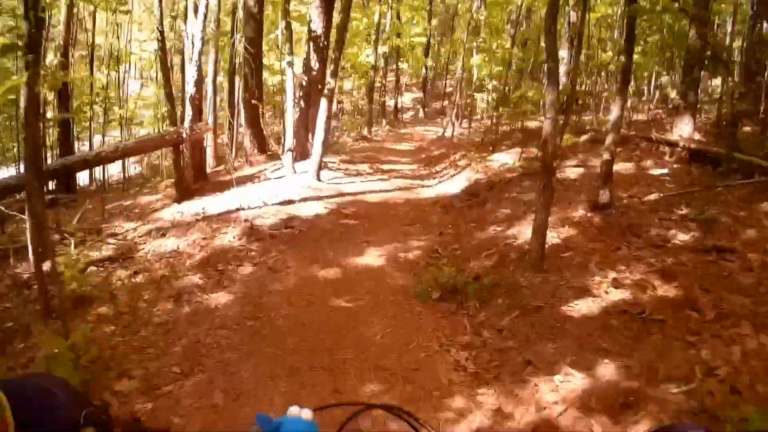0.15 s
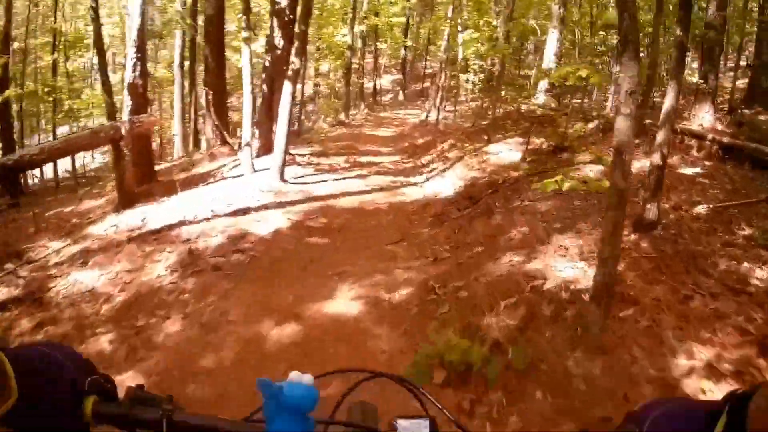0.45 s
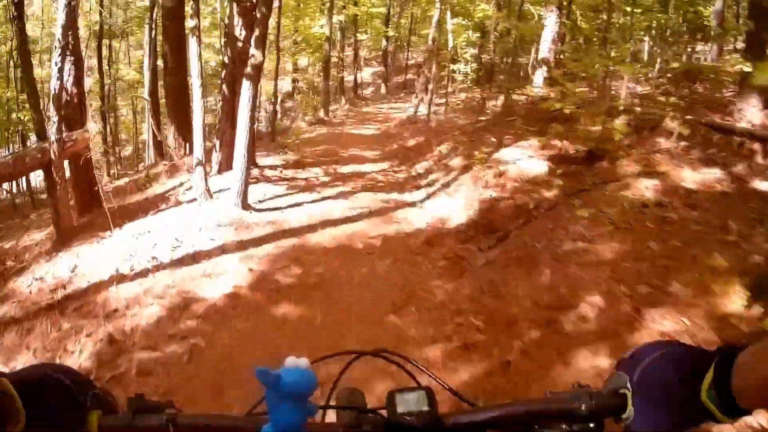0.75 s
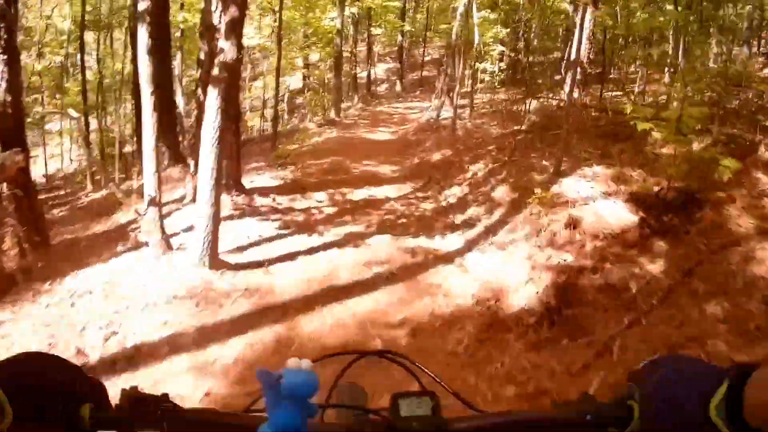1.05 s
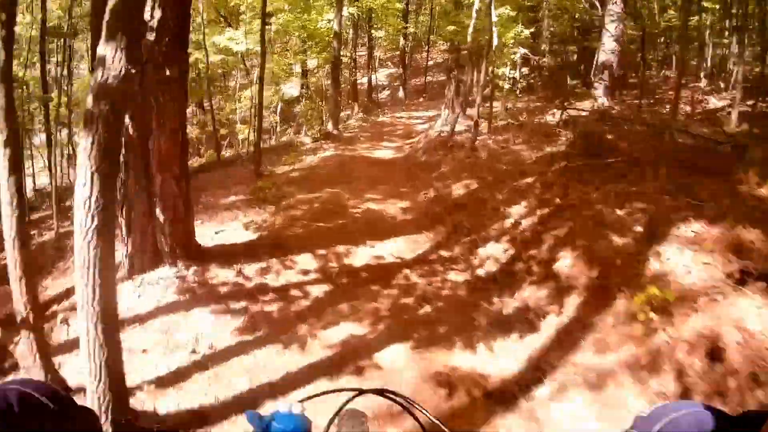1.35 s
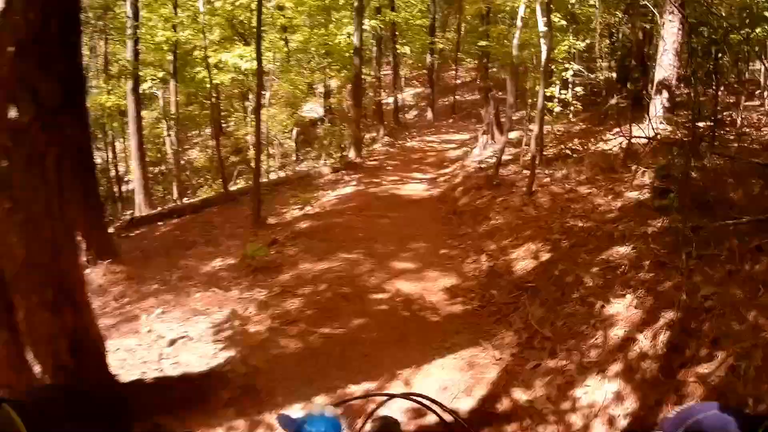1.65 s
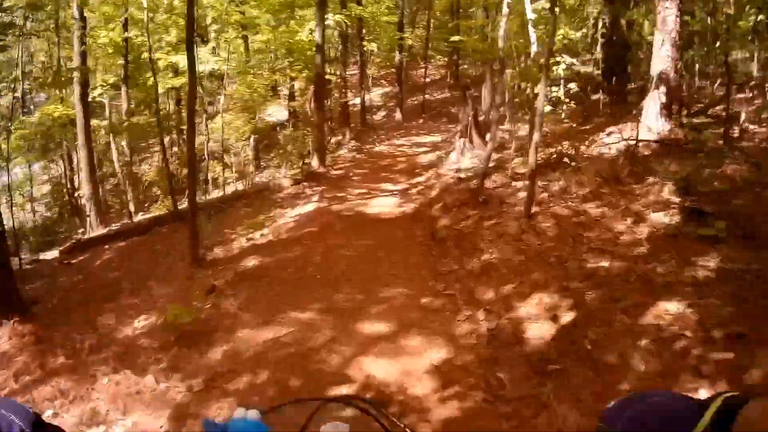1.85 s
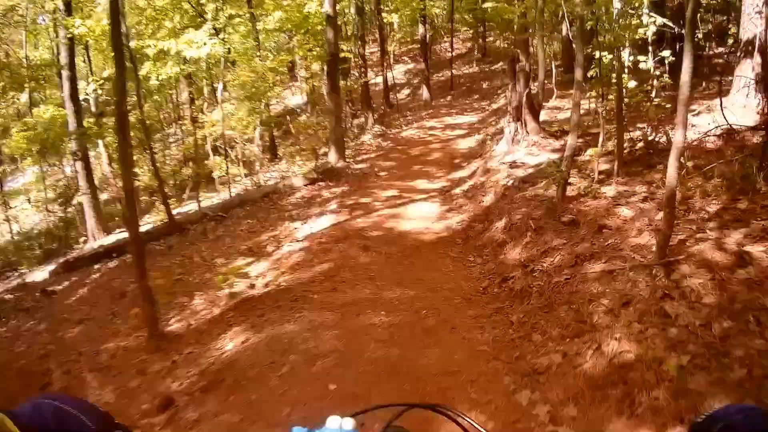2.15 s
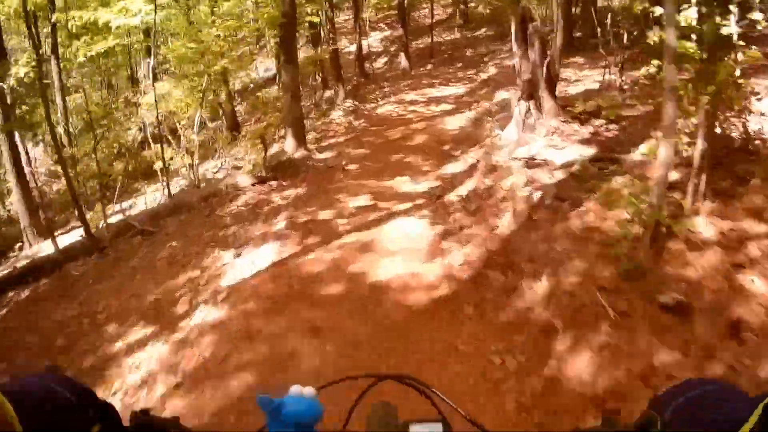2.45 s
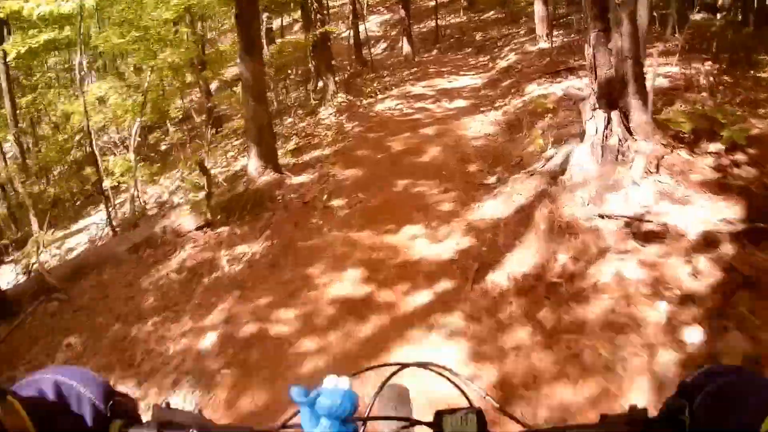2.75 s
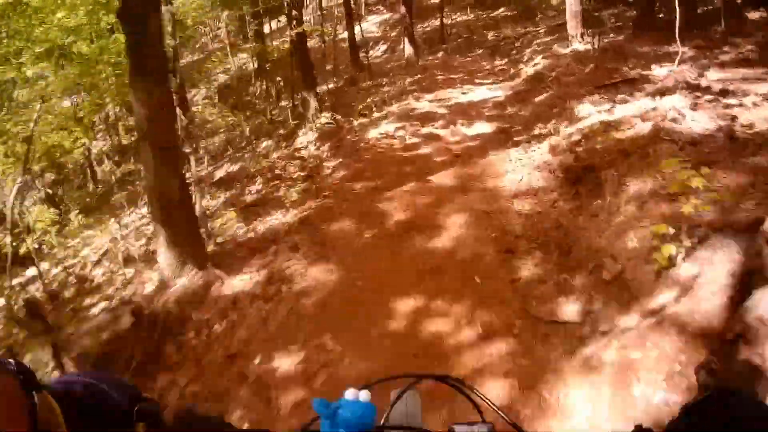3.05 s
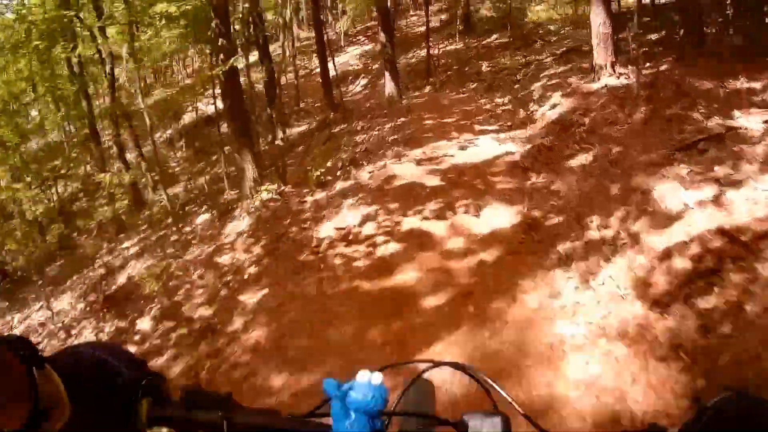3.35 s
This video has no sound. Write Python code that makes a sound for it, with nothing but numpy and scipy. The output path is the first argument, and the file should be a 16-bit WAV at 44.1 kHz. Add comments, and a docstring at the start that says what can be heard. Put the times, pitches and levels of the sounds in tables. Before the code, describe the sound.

Mountain bike tyres roll on a dirt trail, heard close from the rider's chest. At 0-1 s there is faint crunching, a brief soft hum, thin hiss and whine, small stone pops and low wind. A dry tick comes near 1.25 s. From 1.6 s grit and leaves crunch louder; after 2.2 s dull knocks, snaps and clicks crowd in. Wind buffets peak around 3 s with a low shudder at 2.9 s, then ease slightly.

```python
"""A mountain bike gathers speed down a dirt trail in the woods, heard from the rider's chest.
Tyres roll and crunch over dirt, grit and dry leaves: random impacts and noise, filtered and swelling.
Stones and twigs pop, crumbs break and bumps knock as short damped rings; a hard part ticks, litter scuffs.
A low shudder comes late; buffeting wind is lumpy filtered noise, over hiss, a brief hum and a thin whine."""
import sys
import numpy as np
from scipy import signal
from scipy.fft import rfft, irfft
from scipy.io import wavfile

SR = 44100
rng = np.random.default_rng(int(sys.argv[2]) if len(sys.argv) > 2 else 0)


def transcribe(signal):
    """Save signal, clipped to [-1, 1], as a 16-bit WAV file at the path in sys.argv[1]."""
    frames = np.atleast_2d(signal).T
    limited = np.clip(frames, -1, 1)
    pcm = np.round(limited * 32767).astype(np.int16)
    wavfile.write(sys.argv[1], SR, pcm)


N = 154350

# tyres on the ground: t/s, roll level/dB, crunch level/dB (before layer trims)
TYRE_LEVELS = [(0, -68, -64.5), (.25, -72.5, -65.5), (.4, -62.5, -62.5), (.7, -61.5, -64), (.8, -60, -61),
               (1.3, -55.5, -58.5), (1.5, -56.5, -56.5), (1.62, -53.5, -55.5), (1.8, -51.5, -55.5),
               (2.05, -48.5, -51), (2.2, -46.5, -50), (2.3, -47, -50.5), (2.43, -38.5, -47),
               (2.53, -41, -53.5), (2.66, -41, -47), (2.73, -46, -53), (2.85, -40.5, -45.5),
               (2.92, -42, -51.5), (3.03, -41, -50), (3.13, -41.5, -50), (3.19, -41.5, -47),
               (3.5, -41.5, -49.5)]
# crunching grit, relative density: f/Hz, level/dB
CRUNCH_SPECTRUM = [(300, -12), (650, -4), (880, 3.5), (1020, -3), (1170, -3), (1480, -15), (2050, -9.5),
                   (2750, -21), (3500, -21.5), (6000, -32.5), (12000, -64)]


def amp(db):
    """Decibels to gain."""
    return 10 ** (np.asarray(db) / 20)


def unit(x):
    """Scales to rms 1."""
    return x / np.sqrt(np.mean(x ** 2) + 1e-20)


def level(table, axis=1):
    """Gain over time from one dB column, linear in dB between points."""
    rows = np.array(table)
    return amp(np.interp(np.arange(N) / SR, rows[:, 0], rows[:, axis]))


def add(mix, s, sound):
    """Mixes a sound in at time s, in place."""
    part = mix[max(round(s * SR), 0):][:len(sound)]
    part += sound[:len(part)]


def colour(x, points):
    """Minimum-phase filter with the given spectrum; rms 1."""
    hz, db = np.transpose(points)
    log_hz = np.log(abs(np.fft.fftfreq(N, 1 / SR)) + 1)
    log_gain = np.log(amp(np.interp(log_hz, np.log(hz), db)))
    # the Hilbert transform of log gain gives the minimum phase
    response = np.exp(np.conj(signal.hilbert(log_gain)))[:N // 2 + 1]
    return unit(irfft(rfft(x) * response, N))


def drift(rate_hz):
    """Smooth random wander, mostly near and below the given rate; rms 1."""
    ratio = np.fft.rfftfreq(N, 1 / SR) / rate_hz
    return unit(irfft(rfft(rng.standard_normal(N)) * ratio * np.exp(-ratio ** 2), N))


def band(hz, width_hz):
    """Noise in one resonance; rms 1."""
    offset = (np.fft.rfftfreq(N, 1 / SR) - hz) / width_hz * 2
    return unit(irfft(rfft(rng.standard_normal(N)) / (1 + offset ** 2), N))


def grains(per_s, spread_db):
    """Random impacts, most small and a few large; rms 1."""
    size = amp(spread_db * np.minimum(rng.exponential(1, N), 4))
    sign = rng.choice([-1, 1], N)
    return unit(size * sign * (rng.random(N) < per_s / SR))


def snap(hz, cycles):
    """A short damped ring; its envelope reaches 1 after half the given cycles."""
    t = np.arange(2048) / SR
    age = t * hz / cycles * 2
    return age * np.exp(1 - age) * np.sin(2 * np.pi * hz * t)


def background():
    """Steady filtered hiss, a thin phase-wandering whine and an early hum of narrow-band noise."""
    # relative density: f/Hz, level/dB
    hiss_spectrum = [(100, 8), (900, 7.5), (1400, 7.5), (2100, 7.5), (2800, 0.5), (3500, -1), (7000, 0),
                     (13500, -3), (15500, -14)]
    # hum, fading while the bike is slow: t/s, level/dB
    hum_levels = [(0, -58.5), (.13, -59), (.17, -68), (.33, -70), (.39, -64), (.45, -73), (.7, -97)]
    hiss_db, whine_db, whine_hz = -69.5, -88, 8613
    turn = 2 * np.pi * np.arange(N) / SR
    hiss = colour(rng.standard_normal(N), hiss_spectrum)
    hum = band(hz=515, width_hz=70) * level(hum_levels)
    whine = unit(np.sin(whine_hz * turn + 1.0 * drift(rate_hz=13)))
    return amp(hiss_db) * hiss + hum + amp(whine_db) * whine


def wind():
    """Buffets strike the microphone in lumps, over low eddies that grow less with the gusts."""
    # gusts before trim: t/s, level/dB
    gust_levels = [(0, -55.5), (.1, -62), (.15, -48), (.25, -55), (.32, -44.5), (.45, -50.5), (.54, -47),
                   (.82, -47), (.95, -40.5), (1.18, -45.5), (1.4, -40.5), (1.6, -43), (1.71, -36.5),
                   (1.79, -38.5), (1.88, -32), (2.08, -34), (2.3, -30.5), (2.36, -34), (2.44, -31),
                   (2.5, -30.5), (2.56, -29.5), (2.67, -28), (2.73, -34), (2.81, -27.5), (2.88, -29.5),
                   (2.97, -25.5), (3.18, -31.5), (3.3, -29.5), (3.5, -35.5)]
    # relative densities: f/Hz, level/dB
    buffet_spectrum = [(15, -15.5), (30, -10), (70, -1.5), (130, -4.5), (180, -11.5), (300, -21.5),
                       (600, -36), (2000, -84)]
    eddy_spectrum = [(12, -11.5), (26, -9), (42, 2.5), (70, -11), (150, -49), (600, -91)]
    buffet_trim_db, eddy_db, eddy_growth = -0.57, -39, 0.65  # growth: exponent on gust gain
    gust = level(gust_levels)
    lumps = unit(amp(1.5 * drift(rate_hz=6.6)))
    buffets = colour(rng.standard_normal(N), buffet_spectrum) * lumps
    eddies = colour(rng.standard_normal(N), eddy_spectrum)
    return amp(buffet_trim_db) * buffets * gust + amp(eddy_db) * eddies * unit(gust ** eddy_growth)


def shudder():
    """A rough patch shudders the bike: an unsteady low tone swells quickly, then releases slowly."""
    start_s, attack_s, fall_db_per_s = 2.905, 0.02, 42
    shudder_hz, shudder_db = 76, -22.5
    t = np.arange(N) / SR
    age = np.maximum(t - start_s, 0)
    swell = np.minimum(age / attack_s, 1) * amp(shudder_db - fall_db_per_s * age)
    tone = np.sin(2 * np.pi * shudder_hz * t + 0.81 * drift(rate_hz=14.8))
    return swell * unit(tone * amp(1.8 * drift(rate_hz=13)))


def knocks():
    """Wheels meet bumps: dull blows, each a heavily damped low ring."""
    # blows: t/s, level/dB, f/Hz
    blows = [(2.198, -29.5, 200), (2.304, -28.5, 165), (2.34, -31, 240), (2.424, -25.5, 170),
             (2.463, -28, 170), (2.558, -23, 150), (2.827, -23.5, 215), (2.84, -27.5, 260),
             (2.865, -25.5, 175), (2.938, -28, 300), (2.957, -22.5, 110), (3.032, -19.5, 200),
             (3.244, -30, 370), (3.28, -30, 180)]
    out = np.zeros(N)
    for s, db, hz in blows:
        add(out, s, amp(db) * snap(hz, cycles=1.04))
    return out


def ticks():
    """A hard part strikes the bike with a dry click and short rattle, then lands again ringing."""
    # strikes before trim: t/s, level/dB
    strikes = [(1.2535, -39.5), (1.8245, -47), (2.3865, -45), (2.4118, -36), (2.8241, -31.5), (2.903, -46),
               (3.2235, -45)]
    # modes of the ticking part: f/Hz, relative level/dB, t60/s
    modes = [(2570, -10, .014), (3590, 4, .017), (4300, -3, .008), (5080, -2, .008), (5950, -3, .009),
             (7200, -13, .005)]
    # rattle, relative density: f/Hz, level/dB
    rattle_spectrum = [(1000, -12), (2600, -2), (4500, 0), (6200, 0), (8000, -8), (14000, -16)]
    trim_db, rebound_s, rebound_db = .5, .00084, -2
    rattle_db, rattle_decay_s = -19, .003
    out, t = np.zeros(N), np.arange(2048) / SR
    ring = sum(amp(db - 60 * t / t60) * np.sin(2 * np.pi * hz * t) for hz, db, t60 in modes)
    ring = ring / abs(ring).max()
    rattle = colour(rng.standard_normal(N), rattle_spectrum)
    click = snap(hz=4100, cycles=1.1)
    for s, db in strikes:
        tail = amp(rattle_db) * rattle[round(s * SR):][:len(t)] * np.exp(-t / rattle_decay_s)
        add(out, s, amp(db + trim_db) * (click + tail))
        add(out, s + rebound_s, amp(db + trim_db + rebound_db) * ring)
    return out


def pops():
    """A stone or twig snaps under the tyre in a few cycles and scatters a little decaying grit."""
    # snaps before trim: t/s, level/dB, f/Hz, ring/cycles
    snaps = [(.151, -48, 950, 1.3), (.394, -44, 950, 2.2), (.457, -42, 1070, .7), (.715, -44.5, 800, 1.2),
             (.7657, -45, 980, 1.2), (.8835, -43.5, 990, 1.6), (.986, -42.5, 2130, 2.5),
             (1.094, -41, 1000, 1.6), (1.2222, -48, 1700, 1.6), (1.4435, -43.5, 1310, 2.4),
             (1.602, -42, 1750, 1.3), (1.612, -40.5, 660, 2.2), (1.633, -40.5, 700, .8),
             (1.636, -35.5, 1150, 1.3), (1.7222, -42.5, 1500, .5), (1.9, -41, 1000, 1.5),
             (2.085, -38, 850, 1.2), (2.127, -41, 1100, 2), (2.167, -43, 2000, 3), (2.2155, -31, 915, 1.5),
             (2.323, -40, 1080, 2.5), (2.3835, -29, 640, 1.2), (2.411, -36, 1000, 2), (2.59, -30.5, 480, 1),
             (2.632, -33.5, 950, 1.3), (2.687, -38, 1050, 1.2), (2.845, -32, 800, .9),
             (2.8627, -27.5, 900, 1.5), (2.903, -39, 1250, 2), (2.9416, -32, 720, 1.2),
             (3.003, -35, 1100, 1), (3.036, -30, 850, 1.7), (3.088, -38.5, 1950, 2.2),
             (3.189, -37, 1150, 1.4), (3.229, -35, 1100, 2), (3.3265, -31.5, 1000, 1.6),
             (3.345, -30, 760, 1.7), (3.416, -35, 1100, .8)]
    trim_db, grit_gain, grit_decay_s = -.5, .12, .008
    out, t = np.zeros(N), np.arange(2048) / SR
    grit = colour(rng.standard_normal(N), CRUNCH_SPECTRUM)
    for s, db, hz, cycles in snaps:
        scatter = grit[round(s * SR):][:len(t)] * np.exp(-t / grit_decay_s)
        add(out, s, amp(db + trim_db) * (snap(hz, cycles) + grit_gain * scatter))
    return out


def scuffs():
    """The tread slides over loose litter: band noise swells quickly and fades, with an uneven rasp."""
    # slides: t/s, length/s, level/dB, centre f/Hz, width/Hz
    slides = [(.04, .14, -63, 820, 450), (.76, .1, -58, 1050, 600), (1.51, .11, -70, 4050, 500),
              (2.995, .06, -44, 950, 700), (3.08, .05, -56, 2050, 800), (3.41, .085, -47, 1050, 500)]
    rasp_depth_db = 2
    out = np.zeros(N)
    for s, length_s, db, hz, width_hz in slides:
        swell = np.sin(np.pi * np.sqrt(np.linspace(0, 1, round(length_s * SR))))
        rasp = unit(band(hz, width_hz) * amp(rasp_depth_db * drift(rate_hz=96)))
        add(out, s, amp(db) * swell * rasp[:len(swell)])
    return out


def clods():
    """Crumbs of dirt break under the tread: random impacts ring, each size at its own pitch."""
    low_hz, high_hz, sizes, cycles = 380, 1200, 10, 1.6
    total_per_s, spread_db, trim_db = 190, 1.6, -2.8
    crumbs = np.zeros(N)
    for hz in np.geomspace(low_hz, high_hz, sizes):
        impacts = grains(total_per_s / sizes, spread_db)
        crumbs += signal.oaconvolve(impacts, snap(hz, cycles))[:N]
    return amp(trim_db) * unit(crumbs) * level(TYRE_LEVELS, axis=2)


def tyres():
    """Knobs thud on dirt, grit crunches in clumps, leaves crackle; shared random bumps press all three."""
    # relative densities: f/Hz, level/dB
    roll_spectrum = [(90, -29.5), (200, 4.5), (300, 0.5), (470, -3), (570, -1.5), (690, -10.5),
                     (900, -18.5), (1400, -25), (3000, -70)]
    leaf_spectrum = [(1200, -12), (2800, -2), (3800, 1.5), (4700, -2), (7200, -7), (10200, -4), (11500, -7),
                     (13300, -3), (15500, -14)]
    # dry leaves before trim: t/s, level/dB
    leaf_levels = [(0, -77), (.7, -75), (.9, -73), (1.35, -71), (1.55, -66.5), (1.72, -69), (2.03, -67.5),
                   (2.15, -63.5), (2.25, -67), (2.38, -64), (2.52, -66), (2.65, -61.5), (2.77, -66),
                   (2.9, -65), (3.1, -66), (3.21, -62.5), (3.5, -66)]
    roll_trim_db, crunch_trim_db, leaf_trim_db = 0.5, -1, 0.5
    bumps = drift(rate_hz=15.5)

    roll_swell = unit(amp(1.76 * bumps + 0.74 * drift(rate_hz=19.0)))
    roll = colour(grains(per_s=1200, spread_db=2.5), roll_spectrum) * roll_swell

    grit = grains(per_s=900, spread_db=1.5) + 1.1 * rng.standard_normal(N)
    clumps = amp(1.0 * bumps + 0.74 * drift(rate_hz=64))
    crunch = colour(grit * clumps, CRUNCH_SPECTRUM)

    crackle = grains(per_s=1400, spread_db=2) + 1.2 * rng.standard_normal(N)
    leaves = colour(crackle, leaf_spectrum) * unit(amp(.7 * bumps))

    out = amp(roll_trim_db) * roll * level(TYRE_LEVELS)
    out += amp(crunch_trim_db) * crunch * level(TYRE_LEVELS, axis=2)
    out += amp(leaf_trim_db) * leaves * level(leaf_levels)
    return out


def scene():
    """Everything summed at one microphone."""
    surroundings = background() + wind()
    bike = shudder() + knocks() + ticks()
    ground = pops() + scuffs() + clods() + tyres()
    return (surroundings + bike + ground)[None]


def record(dry):
    """The recorder's band limit: a linear-phase low-pass."""
    edge_hz = 15600
    low_pass = signal.firwin(511, edge_hz, window=("kaiser", 9), fs=SR)
    return signal.oaconvolve(dry, low_pass[None], "same")


dry = scene()
out = record(dry)
transcribe(out)
```